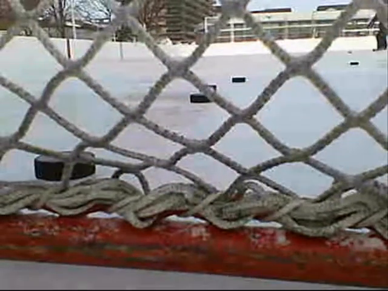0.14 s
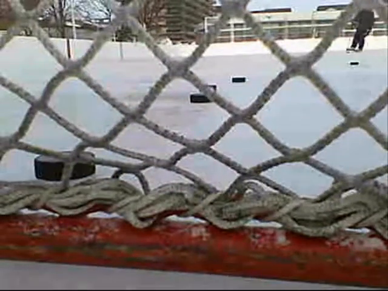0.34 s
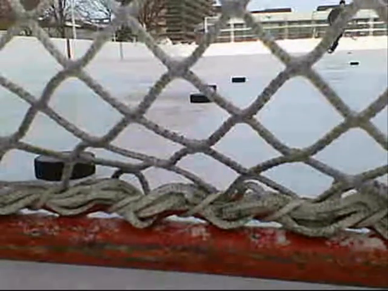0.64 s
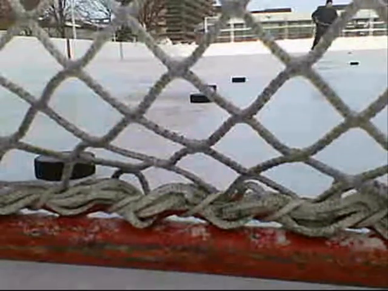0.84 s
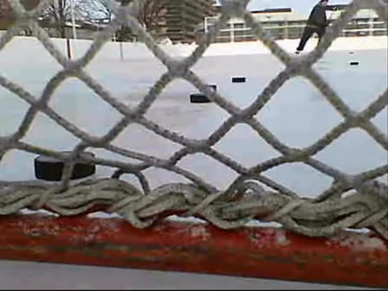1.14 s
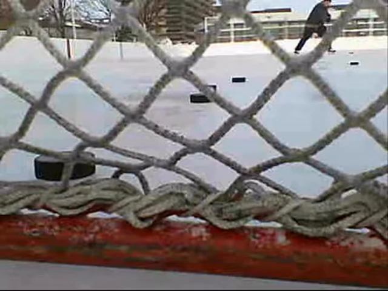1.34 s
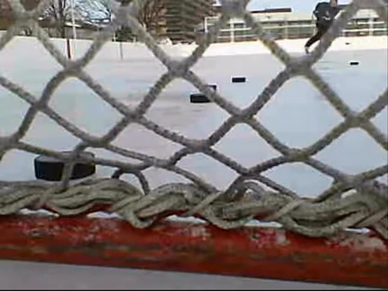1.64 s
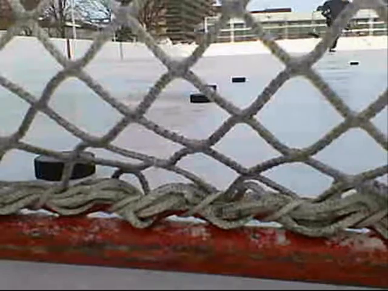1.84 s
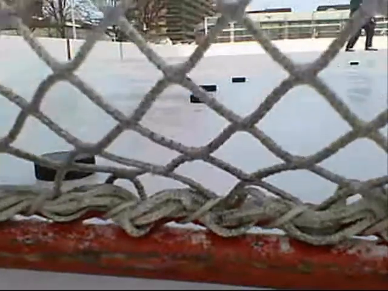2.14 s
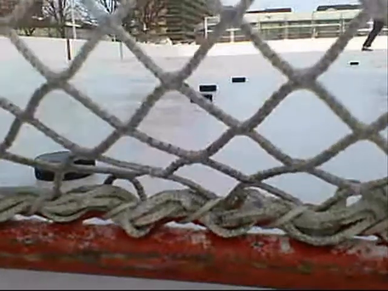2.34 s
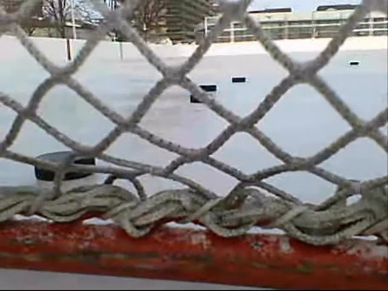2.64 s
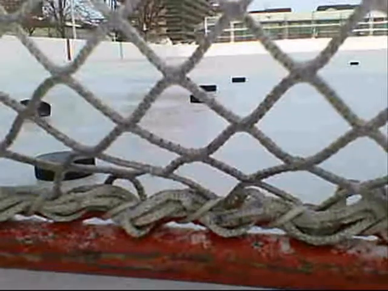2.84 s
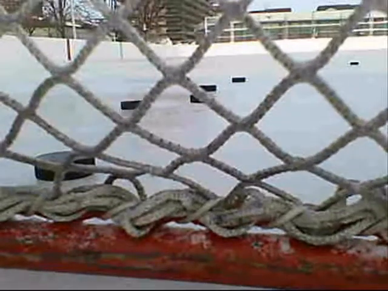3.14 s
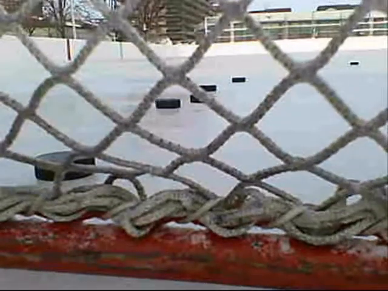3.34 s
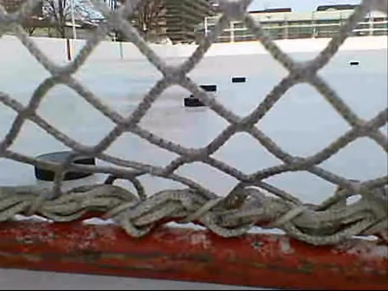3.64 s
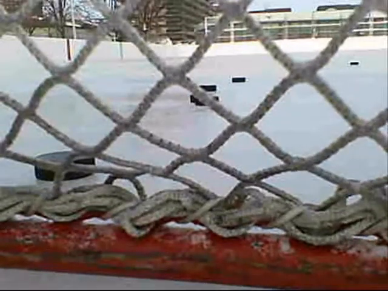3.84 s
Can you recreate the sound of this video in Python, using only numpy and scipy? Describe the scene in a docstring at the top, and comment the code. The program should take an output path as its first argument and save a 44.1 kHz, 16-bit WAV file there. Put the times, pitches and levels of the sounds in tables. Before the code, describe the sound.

Skate blades scrape and chatter on outdoor ice, then a sharp puck shot and rattling pucks

```python
"""Outdoor rink, far traffic beyond it; a small camera lies on the ice behind the goal as a skater carves.
Blades chatter over the ice from the start, slips ringing it, with sudden catches from 0.25 s.
At 1.6 s the shot: stick and puck crack as hard knocks, the stick drags as gritty friction, the level dips.
A thin hiss follows at 2.0 s, a puck lands with a sliding ring at 2.7 s, and from 3.2 s pucks rattle.
The camera samples slowly and holds each sample, so the treble is a mirror image of the midrange."""
import sys
import numpy as np
from scipy import signal
from scipy.fft import rfft, irfft
from scipy.io import wavfile
from scipy.ndimage import uniform_filter1d

SR = 44100
rng = np.random.default_rng(int(sys.argv[2]) if len(sys.argv) > 2 else 0)


def boost(x):
    """Linear amplitude factor 10**(x/20) for a level x in decibels (scalar or array-like)."""
    u = np.asarray(x, float) / 20
    return 10 ** u


def inscribe(sig):
    """Save sig as 16-bit PCM at rate SR to the path in sys.argv[1].

    A 1-D sig is mono; a 2-D sig holds one channel per row.
    Samples are clipped to [-1, 1] before scaling.
    """
    pcm = np.round(np.clip(np.atleast_2d(sig).T, -1, 1) * 32767)
    wavfile.write(sys.argv[1], SR, pcm.astype(np.int16))


N = 176400  # 4 s

# far traffic, relative spectrum: pitch_hz, level_db (per Hz)
CITY_SPECTRUM = [(18, -33), (30, -7), (191, -15.5), (488, -5.5), (2030, -4.5), (4150, -17), (6200, -21),
                 (8060, -47), (13600, -120)]
# scraped ice, relative spectrum: pitch_hz, level_db (per Hz)
ICE_SPECTRUM = [(88, -41), (150, -27), (284, -23.5), (498, -13.5), (564, -12), (1480, -3.5), (2850, -8),
                (4470, -14), (6200, -24.5), (8060, -40), (13600, -120)]
# hard rubber on ice, relative spectrum: pitch_hz, level_db (per Hz)
RUBBER_SPECTRUM = [(88, -84), (150, -37), (446, -20.5), (819, -3.5), (1310, -8.5), (1840, -8), (2510, -8.5),
                   (4400, -3), (6200, -19.5), (8060, -27.5), (13600, -120)]
# thin high hiss, perhaps ice spray settling: start_s, length_s, level_db, pitch_hz
SPRAYS = [(2.044, 0.022, -43, 5270), (2.087, 0.025, -48, 5800), (2.22, 0.027, -48, 5850)]
# stick blade dragging after the shot: start_s, length_s, level_db, pitch_hz
DRAGS = [(1.5995, 0.015, -23.5, 2550), (1.624, 0.012, -29, 1410), (1.682, 0.015, -36, 2200),
         (1.716, 0.0065, -24.5, 2010), (2.098, 0.054, -38.5, 1020), (3.394, 0.014, -36, 880),
         (3.486, 0.011, -34, 885)]
# ring of the ice under a landing puck: final_hz, level_db (relative), t60_s, start_above_final_hz
LANDING_RING = [(1090, 2.5, 0.007, 40), (1720, 0.5, 0.014, 24), (1674, -13.5, 0.14, 80),
                (2400, -20.5, 0.77, 660), (970, -16, 0.1, 103)]
# stick and puck blows: start_s, peak_db, pitch_hz, t60_s, brightness_db
BLOWS = [(1.591, -4, 2860, 0.031, 7), (1.6165, -9, 2170, 0.03, 7), (1.6506, -13, 1730, 0.05, -1),
         (1.655, -9.5, 1790, 0.064, 7), (1.66, -11, 1770, 0.04, 8.5), (1.7095, -13.5, 2400, 0.072, -1),
         (1.721, -24, 3200, 0.047, -11), (2.046, -12, 4480, 0.013, 10), (2.383, -33, 1550, 0.021, 15),
         (2.415, -31.5, 1350, 0.029, 25), (2.522, -25.5, 1510, 0.083, 2), (2.677, -17.5, 2250, 0.09, -6),
         (2.756, -26, 1700, 0.02, 6), (3.164, -21, 1010, 0.02, 7.5), (3.172, -23, 1660, 0.037, -3),
         (3.201, -30, 1930, 0.047, 0), (3.226, -30, 1510, 0.064, 8), (3.355, -28, 4590, 0.01, 4),
         (3.3662, -14, 1470, 0.039, -3), (3.3688, -17.5, 1120, 0.043, 7), (3.376, -16.5, 1520, 0.077, -21),
         (3.4175, -19, 1500, 0.055, 4.5), (3.456, -23.5, 890, 0.071, 9), (3.4838, -17, 1960, 0.04, 0),
         (3.546, -30, 1550, 0.052, 5), (3.604, -26.5, 797, 0.13, 8), (3.6365, -11, 1960, 0.044, 8),
         (3.6455, -15, 1900, 0.045, -7), (3.665, -16, 810, 0.06, 4), (3.671, -18, 2000, 0.045, -8),
         (3.691, -12.5, 1300, 0.05, 5), (3.725, -12.5, 2100, 0.026, 4.5), (3.757, -12, 1660, 0.037, 9),
         (3.794, -14, 1790, 0.022, 0), (3.822, -16.5, 3250, 0.023, 2), (3.859, -23, 1780, 0.084, -7),
         (3.8694, -18.5, 1920, 0.087, 4), (3.89, -16, 2830, 0.042, -1), (3.898, -25, 3240, 0.047, 4),
         (3.91, -22, 1850, 0.038, -6), (3.927, -25, 1800, 0.05, 3), (3.939, -21.5, 1420, 0.038, -8),
         (3.9555, -22, 2960, 0.03, 0)]
# sudden catches of blade or stick on the ice: start_s, peak_db, pitch_hz
CATCHES = [(0.254, -18, 1630), (0.2825, -16, 980), (0.292, -28, 1310), (0.315, -16, 1650),
           (0.323, -12, 915), (0.36, -14.5, 1520), (0.383, -20, 1040), (0.419, -13.5, 1800),
           (0.591, -27, 1440), (0.729, -25, 1460), (0.897, -17, 1650), (0.926, -23, 3500),
           (0.96, -15, 1420), (0.966, -17, 1800), (1.017, -21, 1500), (1.031, -16, 1440),
           (1.08, -12.5, 1280), (1.122, -12.5, 1390), (1.468, -20, 1560), (1.776, -20, 2520),
           (1.798, -24.5, 1310), (1.816, -22.5, 1450), (1.826, -15.5, 1630), (1.853, -10, 2070),
           (1.887, -14.5, 1440), (1.916, -17.5, 1720), (1.921, -17, 1720), (1.936, -12.5, 2960),
           (1.948, -13, 1740), (1.959, -24, 2160)]
# blade pressure on the ice: time_s, level_db, resonance_hz, resonance_db, brightness_db,
# chatter_db (used between 0 and 6), groan_db
SKATE_PATH = [(0, -25, 1390, 0, 0.5, -1, -37), (.2, -29.5, 1350, -13.5, -3.5, 0.5, -22),
              (.37, -26.5, 1280, 4.5, -0.5, 2.5, -5), (.43, -27.5, 1600, -2, -5, -1, -10),
              (.5, -32.5, 1550, -3.5, -3.5, 4, -29), (.68, -36, 1480, 0.5, 0, -0.5, -1),
              (.74, -35, 1480, 9, 3.5, 3, 13), (.81, -31.5, 1560, 6, 2, -6.5, -0.5),
              (1.0, -27, 1720, 3.5, 0.8, 1.2, 6.5), (1.14, -27, 1560, 5, 1.3, -0.5, 4),
              (1.29, -24, 1570, 9, 6, -3.5, 1.5), (1.39, -30.5, 1650, 6.5, 2.3, -0.5, 4),
              (1.5, -26.5, 1360, -11, -1.5, 0, -32), (1.58, -34, 1750, 5, 1, 2, 1),
              (1.75, -39.5, 1820, 2, 6.5, 3.5, -7), (1.83, -32.5, 1450, -5, 1.5, 2.5, -6),
              (1.95, -26, 2370, 8, 2.5, 1.5, -32), (2.04, -27, 1920, -4.5, 1.5, 1, -16),
              (2.09, -38.5, 1280, -22, -1, -0.5, 10), (2.22, -44, 1770, 12, 6, 2.5, 8),
              (2.38, -51.5, 1900, 12, 6, 1.5, -26), (2.55, -41, 1540, -0.5, -2.5, 2.5, -22),
              (2.72, -48, 1500, 2.5, 3.5, 4, 14), (2.82, -39, 1470, -12.5, 1, 0.5, 11.5),
              (3.1, -54, 1420, 12.5, 8.5, 2, 13.5), (3.2, -41.5, 1450, -17, -4, 10, 2),
              (3.34, -48.5, 1390, 11, 6.5, 3, 11), (3.45, -45.5, 1250, -3, -2.5, 5, 8.5),
              (3.62, -35.5, 1620, -19, -3.5, 0, 6), (3.75, -41.5, 1520, -24, -2, 6, -13),
              (3.84, -49, 1600, 4, 1, 12, -16), (3.88, -35.5, 1820, -3, 1.5, 5.5, -7),
              (4.0, -33.5, 1800, -11, -2, -4, -6)]
# brief dips in level: centre_s, half_width_s (to 1/e of the dB depth), level_db
DIPS = [(1.600, 0.0013, -10), (1.624, 0.0016, -11), (1.682, 0.0016, -12), (1.74, 0.031, -5.5)]

CITY_DB, CITY_SWELL_DB = -47.5, 0.44
BRIGHT_HZ = 2840  # brightness tilts the spectrum about this pitch
LANDING_S, LANDING_DB, LANDING_RISE_S, LANDING_END_S = 2.674, -18.5, 0.00396, 0.071
SLIDE_S, FLUTTER_DB = 0.022, 5.5  # time constant of the pitch slide; rms of the level flutter
RISE_S, CRACK_S, CLICK_DB, TAIL_DB = 0.0006, 0.00068, 6.5, -15.5
PITCH_DB, PITCH_WIDTH = 6.5, 0.34  # loose resonance of a knock; width as a share of its pitch
TAIL_BRIGHT_DB, HOLLOW_HZ, HOLLOW_WIDTH_HZ, HOLLOW_DB = 1, 860, 330, -2.5  # low ring within the tail
CATCH_T60_S, CATCH_BRIGHT_DB = 0.046, 5.5
SLIPS_PER_S, SNAPS_PER_S, SNAP_DB = 7000, 200, -12.5  # snaps: sharp cracks of ice under the blade
JOLTS_PER_S, JOLT_S = 180, 0.0039
BITE_WIDTH_HZ, GROAN_HZ, GROAN_WIDTH_HZ = 950, 505, 294
MIC_LOW_HZ = 64  # the microphone is 6 dB down here
HOLD_HZ, JITTER = 12496, 0.09  # sampling rate; rms clock wander as a share of one held sample
HISS_DB, EDGE_HZ = -75, 15800


def evened(x):
    """Scales to an rms of 1."""
    return x / np.sqrt(np.mean(x ** 2) + 1e-20)


def add(mix, start_s, sound):
    """Lays a sound into the mix, cut off at the end."""
    part = mix[round(start_s * SR):][:len(sound)]
    part += sound[:len(part)]


def colour(x, points):
    """Causal minimum-phase filter with the given spectrum."""
    point_hz, point_db = np.transpose(points)
    hz = abs(np.fft.fftfreq(4096, 1 / SR))
    gain_db = np.interp(np.log(hz + 1), np.log(point_hz + 1), point_db)
    log_gain = np.log(boost(gain_db))
    # the Hilbert transform of the log gain gives the phase
    taps = np.fft.ifft(np.exp(np.conj(signal.hilbert(log_gain)))).real[:2048]
    return signal.oaconvolve(x, taps)[:len(x)]


def tilt(x, bright_db):
    """Lifts the treble and lowers the rest by bright_db; a negative value does the reverse."""
    low = signal.lfilter(*signal.butter(3, BRIGHT_HZ, "low", fs=SR), x)
    high = signal.lfilter(*signal.butter(3, BRIGHT_HZ, "high", fs=SR), x)
    return low / boost(bright_db) + high * boost(bright_db)


def resonate(x, hz, width_hz):
    """A resonance of gain 1 that follows the curve hz: shift down to 0 Hz, smooth, shift back."""
    turn = np.exp(2j * np.pi * np.cumsum(hz * np.ones(len(x))) / SR)
    r = np.exp(-np.pi * width_hz / SR)
    return 2 * (turn * signal.lfilter([1 - r], [1, -r], x / turn)).real


def grit(size, per_s, spread_db):
    """Random tiny fractures of uneven size."""
    chance, size_draw = rng.random(size), rng.exponential(1, size)
    pulses = rng.standard_normal(size) * (chance < per_s / SR)
    return evened(pulses * boost(spread_db * np.minimum(size_draw, 4)))


def city():
    """Distant traffic wash: coloured noise that swells slowly."""
    swell = evened(uniform_filter1d(rng.standard_normal(N), 3000))
    wash = evened(colour(rng.standard_normal(N), CITY_SPECTRUM))
    return boost(CITY_DB + CITY_SWELL_DB * swell) * wash


def rub(length_s, level_db, hz, width_hz, release_s):
    """Gritty friction through a double resonance, with a sharp start, held, then dying."""
    t = np.arange(0, length_s + 6 * release_s, 1 / SR)
    shape = np.minimum(t / 0.0025, 1) * np.exp(-np.maximum(t - length_s, 0) / release_s)
    friction = colour(grit(len(t), 9000, 1.3), RUBBER_SPECTRUM)
    ringing = resonate(resonate(friction, hz, width_hz), hz, width_hz)
    return boost(level_db) * shape * evened(ringing)


def spray(length_s, level_db, hz):
    """Thin high hiss: fine grit in a narrow band that stops quickly."""
    return rub(length_s, level_db, hz, width_hz=800, release_s=0.003)


def drag(length_s, level_db, hz):
    """Stick blade scraping: gritty friction in a wide band that dies more slowly."""
    return rub(length_s, level_db, hz, width_hz=2170, release_s=0.0074)


def landing():
    """A puck lands hard: the ring flutters and slides down in pitch, as bending waves in ice do."""
    t = np.arange(SR // 10) / SR
    after = t - LANDING_RISE_S
    noise = rng.standard_normal((len(LANDING_RING), len(t)))
    flutter = evened(uniform_filter1d(uniform_filter1d(noise, 120), 120))
    flutter = flutter * np.minimum(t / 0.014, 1)
    ring = 0
    for (hz, db, t60, fall_hz), wobble in zip(LANDING_RING, flutter):
        level_db = db + FLUTTER_DB * wobble - 60 * np.maximum(after, 0) / t60
        cycles = hz * after - fall_hz * SLIDE_S * np.exp(-t / SLIDE_S)
        ring = ring + boost(level_db) * np.cos(2 * np.pi * cycles)
    rise = np.minimum(t / LANDING_RISE_S, 1) ** 2
    fade = np.clip((LANDING_END_S - t) / 0.01, 0, 1)
    return boost(LANDING_DB) * rise * fade * ring


def knock(spectrum, peak_db, hz, t60, bright_db):
    """A hard click and a crack, then a rattling tail, coloured by the body and one loose resonance."""
    t = np.arange(4000) / SR
    rise = np.minimum(t / RISE_S, 1) ** 3
    crack_noise, tail_noise = rng.standard_normal((2, len(t)))
    click = boost(CLICK_DB) * (np.arange(len(t)) == round(RISE_S * SR))
    crack = click + rise * np.exp(-t / CRACK_S) * crack_noise
    tail = rise * boost(TAIL_DB - 60 * t / t60) * tail_noise
    hollow = resonate(tail, HOLLOW_HZ, HOLLOW_WIDTH_HZ)
    tail = tilt(tail, TAIL_BRIGHT_DB) + boost(HOLLOW_DB) * hollow
    body = evened(colour(crack + tail, spectrum))
    loose = evened(resonate(body, hz, hz * PITCH_WIDTH))
    out = tilt(body, bright_db) + boost(PITCH_DB) * loose
    return boost(peak_db) * out / abs(out).max()


def blow(peak_db, hz, t60, bright_db):
    """Stick or puck struck: a knock with the spectrum of hard rubber on ice."""
    return knock(RUBBER_SPECTRUM, peak_db, hz, t60, bright_db)


def ice_catch(peak_db, hz):
    """Blade or stick catching: a bright knock with the spectrum of scraped ice."""
    return knock(ICE_SPECTRUM, peak_db, hz, CATCH_T60_S, CATCH_BRIGHT_DB)


def skates():
    """Dense slips and snaps ring the ice; jolts make the pressure jump and sag."""
    t = np.arange(N) / SR
    s, *cols = np.transpose(SKATE_PATH)
    level_db, hz, bite_db, bright_db, chatter_db, groan_db = (np.interp(t, s, c) for c in cols)
    jolts = np.minimum(rng.exponential(1, N), 2.5) * (rng.random(N) < JOLTS_PER_S / SR)
    jolts = signal.lfilter([1], [1, -np.exp(-1 / (JOLT_S * SR))], jolts)
    pressure = np.sqrt(jolts + 0.019)
    chatter = boost(np.clip(chatter_db, 0, 6) * evened(pressure - pressure.mean()))
    slips = grit(N, SLIPS_PER_S, 1.3) * chatter
    snaps = boost(SNAP_DB) * tilt(grit(N, SNAPS_PER_S, 2.9), 5.2)
    body = evened(colour(slips + snaps, ICE_SPECTRUM))
    bite = resonate(resonate(body, hz, BITE_WIDTH_HZ), hz, BITE_WIDTH_HZ)
    body = body + boost(bite_db) * bite
    body = body + boost(groan_db) * resonate(body, GROAN_HZ, GROAN_WIDTH_HZ)
    return boost(level_db) * evened(tilt(body, bright_db))


def scene():
    """The rink as one channel: traffic, spray, stick, pucks and blades, with brief dips in level."""
    mix = city() + skates()
    for source, table in ((spray, SPRAYS), (drag, DRAGS), (blow, BLOWS), (ice_catch, CATCHES)):
        for start_s, *row in table:
            add(mix, start_s, source(*row))
    add(mix, LANDING_S, landing())
    t = np.arange(N) / SR
    dip_db = sum(db * np.exp(-((t - s) / width_s) ** 2) for s, width_s, db in DIPS)
    return (mix * boost(dip_db))[None]


def low_pass(x):
    """Removes everything above the highest recorded frequency."""
    return signal.sosfilt(signal.butter(12, 16990, fs=SR, output="sos"), x)


def record(dry):
    """Thin microphone, slow sampling with each value held on an unsteady clock, circuit hiss, band edge."""
    f = np.fft.rfftfreq(N, 1 / SR)
    count = int(N * HOLD_HZ / SR)
    microphone = f ** 2 / (f ** 2 + MIC_LOW_HZ ** 2)
    hold_droop = np.sinc(np.minimum(f / HOLD_HZ, 0.5))  # treble loss of holding, made up in advance
    spectrum = rfft(dry[0]) / hold_droop * microphone
    slow = irfft(spectrum[:count // 2 + 1], count) * count / N
    # holding without smoothing leaves the mirror image above half of HOLD_HZ
    at = np.arange(N) * count / N + JITTER * rng.standard_normal(N)
    held = slow[np.clip(at.astype(int), 0, count - 1)]
    held = held + boost(HISS_DB) * rng.standard_normal(N)
    edge = signal.firwin(255, EDGE_HZ, window=("kaiser", 5), fs=SR)
    mix = signal.oaconvolve(held, edge, "same")[None]
    return low_pass(mix)


dry = scene()
out = record(dry)
inscribe(out)
```